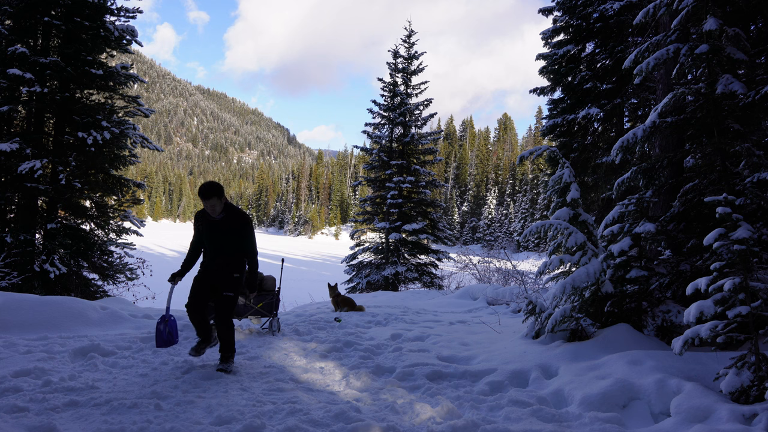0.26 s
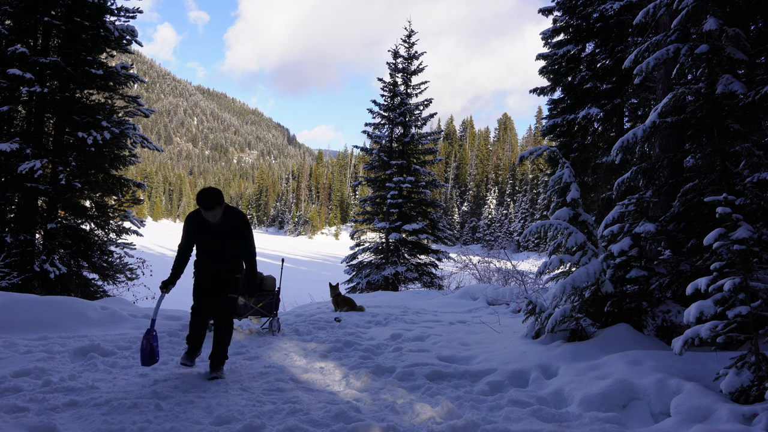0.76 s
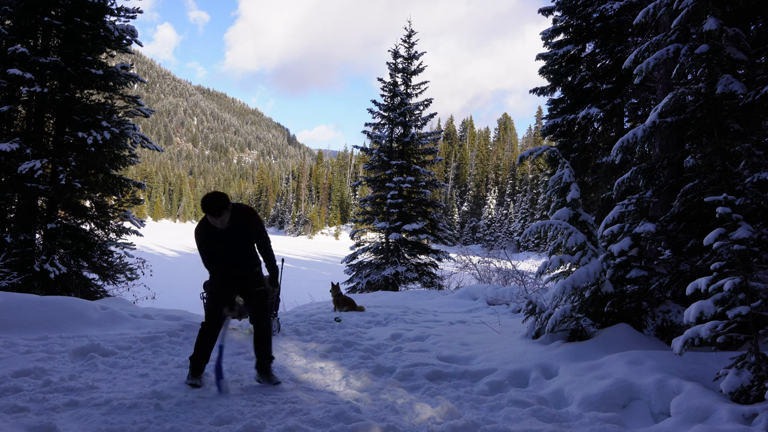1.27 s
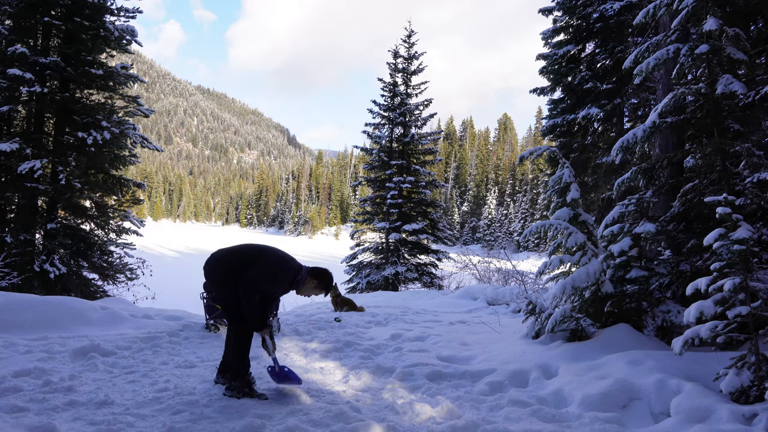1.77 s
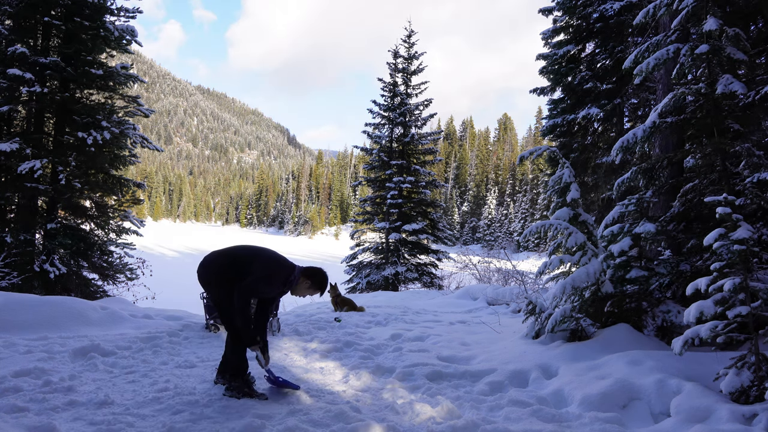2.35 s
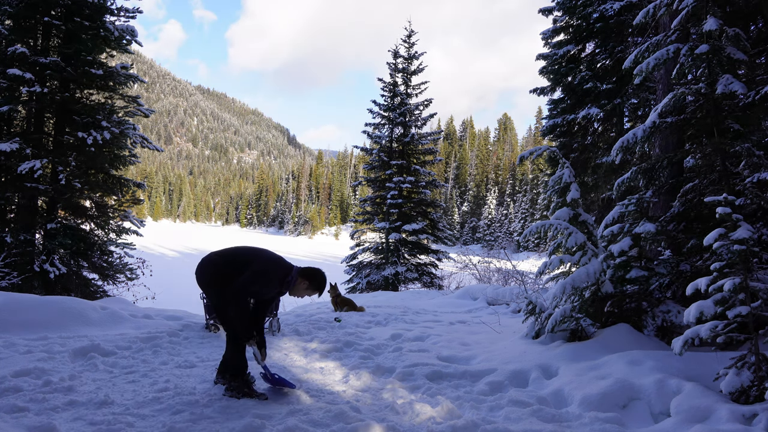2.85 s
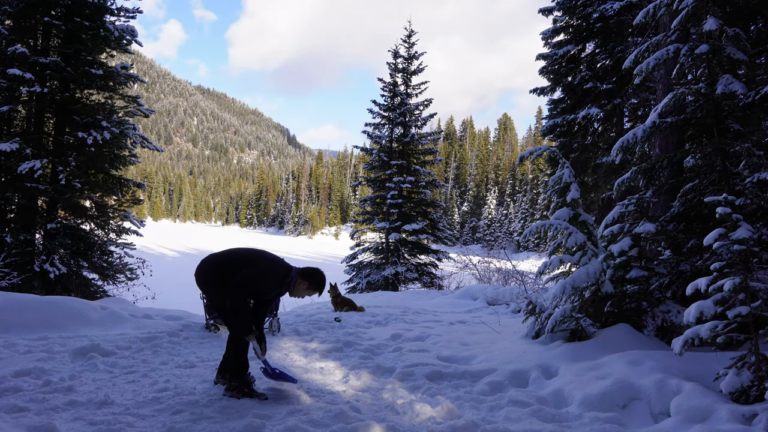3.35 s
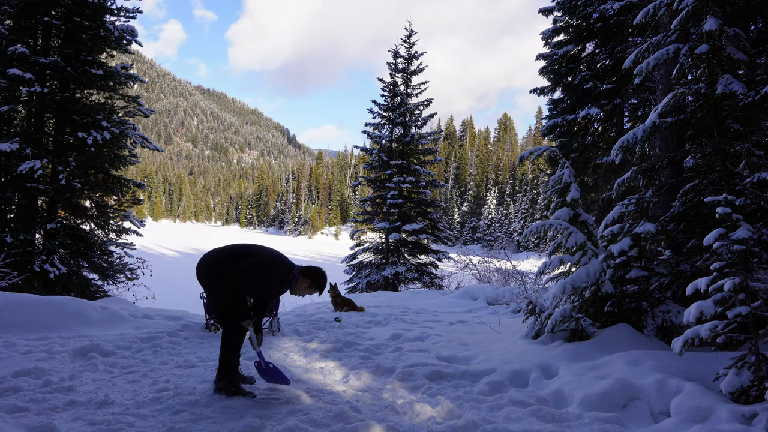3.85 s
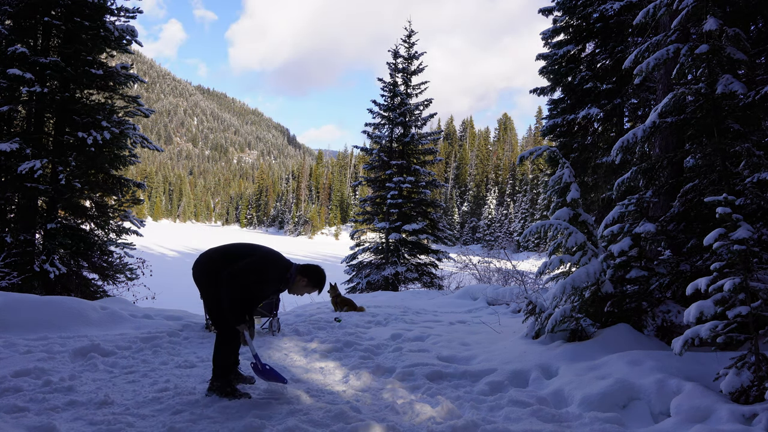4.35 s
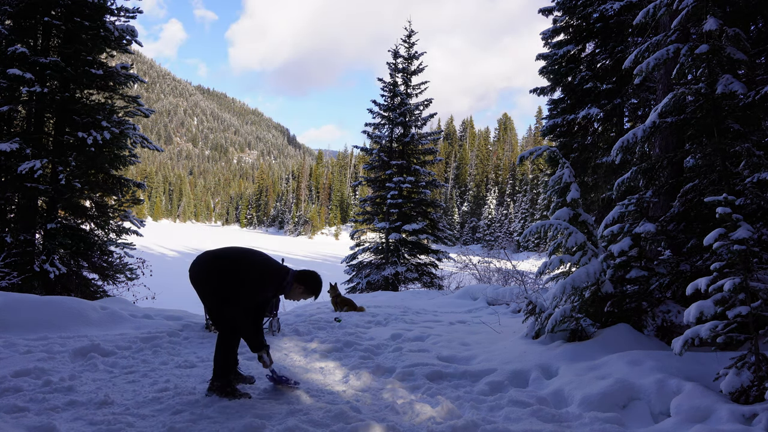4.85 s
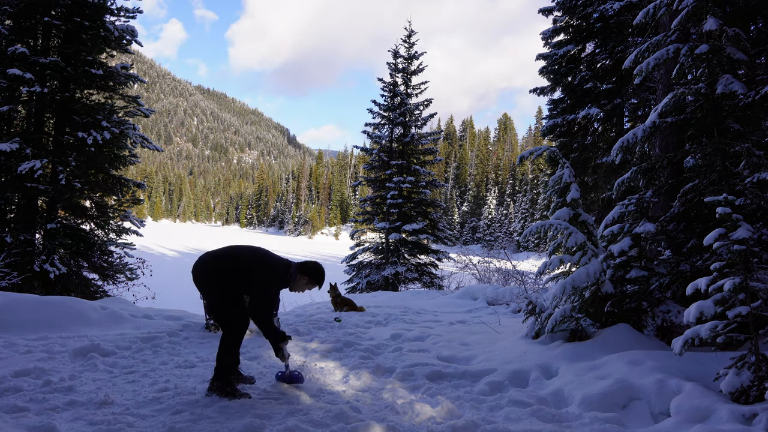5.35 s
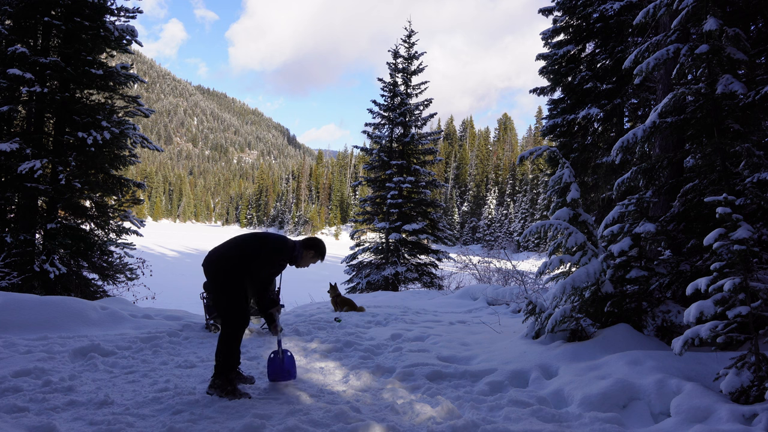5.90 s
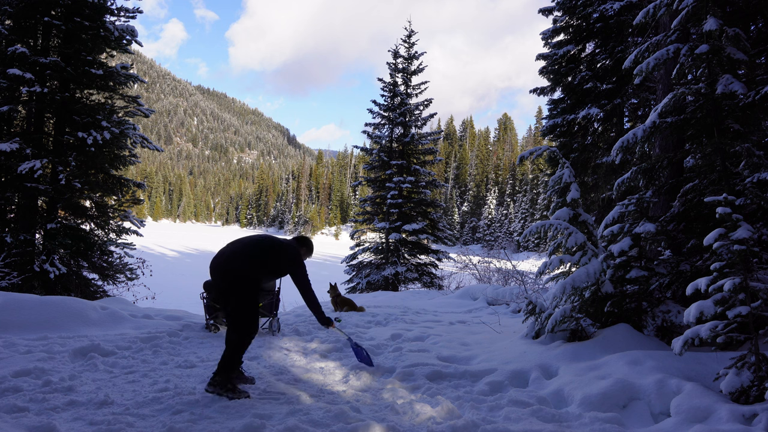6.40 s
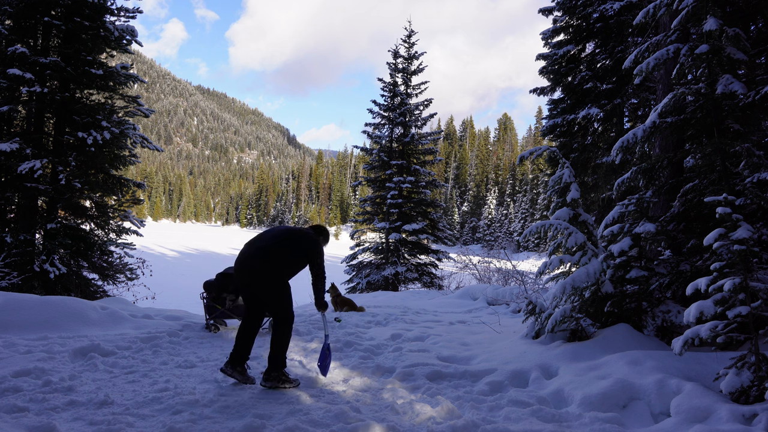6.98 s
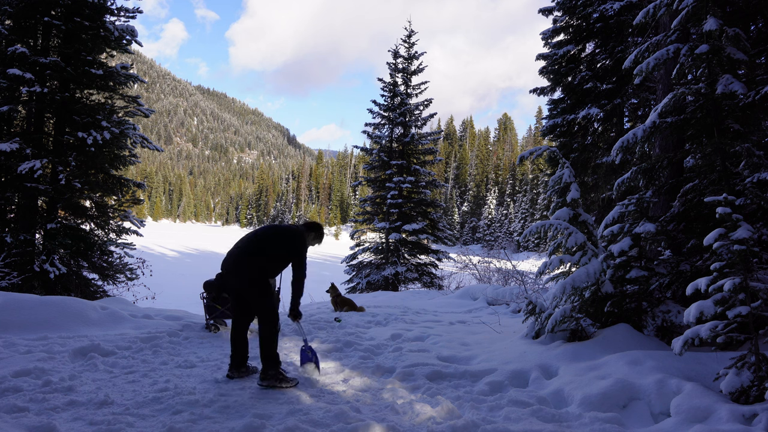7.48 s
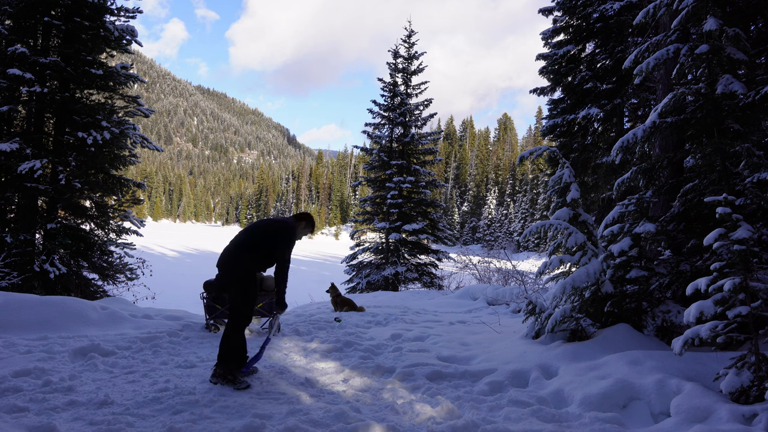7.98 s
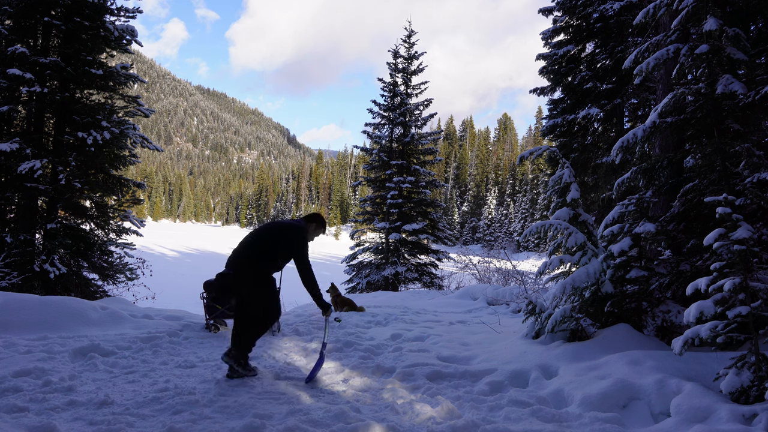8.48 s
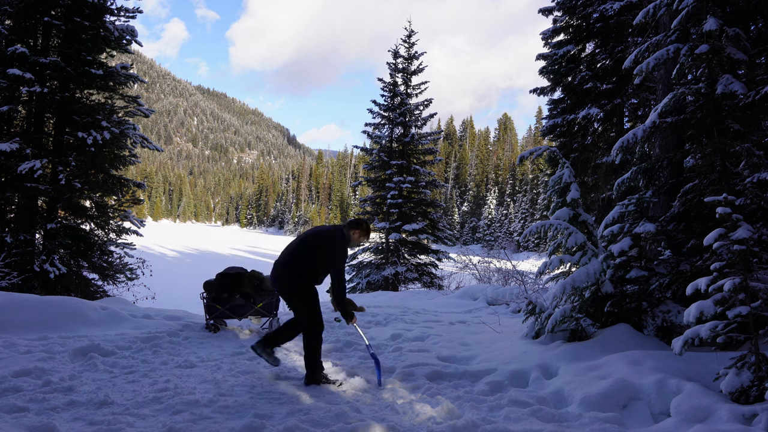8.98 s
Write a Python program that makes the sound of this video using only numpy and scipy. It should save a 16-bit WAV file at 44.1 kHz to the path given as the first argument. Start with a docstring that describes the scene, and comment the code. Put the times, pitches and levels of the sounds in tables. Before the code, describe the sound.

A few muffled snow steps lead to sharp, gritty shovel cuts in frozen crust, then knocks, drags and one loud crunch in quiet forest air.

```python
"""Boots thud in packed snow, then a light metal shovel chops nine times at the crust and is dragged about.
Each cut is a dense burst of random ice-grain clicks, shaped by crust and scoop resonances.
Between cuts the blade ticks, scrapes and rings as a bank of damped modes driven by the contact sounds.
Trees return a faint echo of scattered clicks over very quiet filtered noise; a few thin high chirps fall in pitch."""
import sys
import numpy as np
from scipy import signal
from scipy.fft import rfft, irfft
from scipy.io import wavfile

SR = 44100
rng = np.random.default_rng(int(sys.argv[2]) if len(sys.argv) > 2 else 0)


def generate_wav(sig):
    """Save sig (samples, or channels by samples) to the path in sys.argv[1] as 16-bit PCM at SR."""
    pcm = np.round(np.clip(np.atleast_2d(sig).T, -1, 1) * 32767).astype(np.int16)
    wavfile.write(sys.argv[1], SR, pcm)


N = 407482
TIME_S = np.arange(N) / SR

# spectrum of still forest air: [hz, level_db]
AIR_COLOUR = [(15, -24.5), (25, 4), (87, -9.5), (195, -2), (363, -3), (754, -2), (1160, -10), (1290, -8),
              (2280, -9), (4490, -18), (5730, -20), (14800, -26.5), (16000, -23.5)]
# thin high chirps: [time_s, relative_level_db, mid_pitch_hz]
CHIRPS = [(1.6107, -25.5, 7140), (2.0777, -37.5, 8510), (2.8963, -29, 8860), (3.0415, -53.5, 8400),
          (3.9449, -46.5, 7950), (4.8534, -33, 7010)]
# boot landings, heel first: [heel_s, level_db, grit_db, roll_to_sole_s]
STEPS = [(.126, -33, -3, 0.01), (.416, -32, -1, 0.0096), (0.617, -31, -1.5, 0.02), (.943, -34.5, -.5, .011),
         (8.839, -40.5, 6.5, .012), (8.863, -42, 0.5, .015), (8.903, -49.5, 8.5, .01),
         (9.198, -48, -2, .01)]
# spectrum of a boot on the pack: [hz, level_db]
BOOT_COLOUR = [(18, -36), (30, 3), (253, -1.5), (497, -6), (837, -13), (1030, -9), (1560, -12), (1780, -14),
               (4310, -23.5), (6040, -30.5), (15000, -41.5)]
# heel resonance: centre_hz, width_hz, lift_db
HEEL_THUD = (216, 170, 3.1)
# spectrum of loose crumbs: [hz, level_db]
CRUMB_COLOUR = [(59, -53), (100, -20), (1480, -9.5), (1580, -6.5), (2320, -4.5), (2580, -7), (2930, -2.5),
                (11200, -15.5), (16000, -32)]
# spectrum of breaking crust: [hz, level_db]
CRUST_COLOUR = [(35, -66.5), (60, -24.5), (301, -20), (469, -16.5), (682, -11), (882, -15.5), (1440, -10),
                (2350, -1), (2900, -5), (3270, -0.5), (5210, -2.5), (7230, -8.5), (8710, -9.5),
                (13900, -22), (16000, -32.5)]
# hollow resonances of the scoop pressed into snow: [centre_hz, width_hz, lift_db]
SCOOP = [(503, 55, 5.5), (671, 170, -6), (882, 140, 5.5), (1400, 310, 0.5), (2360, 66, 4.5),
         (2990, 230, 2.5), (7800, 400, -2), (8320, 590, 2.5), (9500, 310, -4)]
# blade sliding over snow: [start_s, length_s, start_level_db, end_level_db, body_db, brightness_db, ring_db]
DRAGS = [(1.225, 0.15, -43, -39, -5.5, 3.5, -2.5), (1.418, .07, -55, -59, -7, 0.5, -6.5),
         (1.621, 0.021, -49, -54.5, 2, -1, -6), (1.736, 0.075, -57.5, -58, -8, -6.5, -9),
         (3.889, 0.062, -65, -55.5, 15, -7, -17), (4.294, .09, -58, -67, -10.5, 2, 0),
         (5.469, 0.081, -69, -60, -5, 2, 0), (5.592, 0.063, -52, -53.5, -1, -4, -5),
         (6.601, 0.31, -54.5, -44.5, 1.5, 3, -10), (7.227, 0.34, -54, -42, -2.5, -2, -8),
         (7.597, 0.21, -56, -57.5, 4, -2.5, -2.5), (8.239, 0.064, -51, -57, 0.5, 5.5, -4),
         (8.328, 0.28, -61.5, -58.5, -4.5, 2, -7.5), (8.593, 0.11, -49, -63.5, -10, 4.5, -4.5),
         (8.951, 0.072, -55.5, -48.5, -7, 2, -8), (9.049, 0.22, -42.5, -57, -12.5, 0.5, -5)]
# blade knocking on crust and lumps: [time_s, level_db, body_db, brightness_db, ring_db]
TAPS = [(0.79, -51.5, 6, -18, -6), (1.05, -54.5, 14.5, -2, -7), (1.223, -42, 9, 9, -3),
        (1.275, -39, 5, 9, -5), (1.324, -28.5, -1, 0.5, -8), (1.354, -28, 8, -1, -19),
        (1.389, -26, -15, -12, -18.5), (1.577, -40, 20, 6, -11.5), (1.714, -39, -20, -17, 1.5),
        (1.829, -38.5, 4, 0.5, -7), (1.847, -41.5, 5.5, -4, -12), (1.562, -39, 7.5, -10.5, -13.5),
        (5.723, -28, 1, -2, -16), (7.174, -61.5, 17, 12, -15), (2.055, -38, 0, -7, -25),
        (2.092, -41.5, 7, -7, -27), (2.408, -37, 6, 0.5, -28), (2.509, -35.5, 0, -2.5, -16),
        (3.359, -49, -13, -5, -1), (3.408, -54.5, -12, -3.5, 3), (3.649, -36.5, -6, 1.5, -1.5),
        (3.771, -45.5, -21.5, 1, -5.5), (4.206, -31, 5, -6.5, -24), (4.575, -40.5, 9, -17, -9.5),
        (4.596, -34, 7.5, -5, -15.5), (4.873, -40.5, -3.5, -11, -23), (5.109, -45, -15, -7.5, -9.5),
        (5.285, -31, 5, 0, -17), (5.365, -41.5, 7, 3.5, -20), (5.963, -35.5, 11.5, -12, -4),
        (6.064, -40, 9.5, -15, -9), (6.123, -39, 3.5, -12.5, -10), (6.428, -45.5, 6, -5.5, -9),
        (6.442, -39, 3.5, -19, -6), (6.67, -46, 5, -3, -13), (6.98, -44, 11, -16, -1),
        (7.249, -39, 10.5, -26, -8), (7.347, -30, 0.5, -12, -12), (7.424, -32, -1, -13, -21),
        (7.501, -32, -6, -7, -8), (7.648, -40, -11, -5, -20), (7.701, -42, 5, 0, -24),
        (7.847, -45.5, 16.5, -13, -4), (8.301, -40, -1, -1, -27), (8.437, -49, 6, -3, -24),
        (8.903, -42.5, 14.5, -8, -5.5), (9.072, -32, -8, -8, -17), (9.101, -40, 1, -2, -3)]
# blade ploughing through crust: [time_s, level_db, rise_s, hold_s, fall_s, body_db, brightness_db]
CRUNCHES = [(3.583, -26, 0.0015, 0.0014, 0.016, 7.5, 0.5), (4.794, -25, 0.0019, 0.0065, 0.014, -0.5, 0),
            (5.724, -27, 0.00077, 0.012, 0.01, 16, -7), (5.819, -29, 0.0089, 0.085, 0.022, 7.5, -4.5),
            (5.851, -23.5, 0.0042, 0.02, 0.0023, 5, -5), (5.959, -23, 0.0093, 0.0033, 0.0068, -0.5, -3),
            (6.553, -36, 0.0037, 0.022, .0066, -1, -1), (6.589, -25, 0.0029, 0.0025, 0.0064, 4.5, -4),
            (6.704, -30, 0.0027, .0025, 0.017, 3, -6.5), (6.798, -36.5, 0.013, .007, 0.0079, 4, -1),
            (6.851, -43, .0097, 0.035, 0.015, 15.5, 2.5), (7.373, -29, 0.0052, 0.018, 0.0089, -2, -8.5),
            (7.539, -20, .004, 0.028, 0.0023, -6, -10), (7.576, -12.5, 0.0086, 0.0089, 0.0092, -6, -11.5),
            (7.741, -39, 0.005, 0.017, 0.014, 6, -1.5), (8.208, -35, 0.00092, 0.028, 0.0093, 3.5, -1),
            (9.184, -32.5, 0.0096, 0.012, 0.019, -5, -3.5)]
# colour of ploughed crust: less deep bass, dips near 500 Hz and 5 kHz, more top treble:
# [centre_hz, width_hz, lift_db]
PLOUGH = [(86, 70, -7.5), (190, 78, 1), (494, 120, -3.5), (5460, 4300, -5), (13300, 6600, 2.5)]
# modes of blade and shaft, t60 before damping: [hz, level_db, t60_s]
BLADE_MODES = [(500, -4, .08), (835, -2, .12), (1238, -4, .25), (1352, -3, .3), (1620, 0, .42),
               (1818, -3, .26), (1950, -9, .2), (2275, -3, .14), (2365, -2, .11), (2720, -9, .9),
               (2930, -1, .18), (3270, -4, .11), (3640, -.5, .13), (3980, -3, .13), (4310, -6, .12),
               (4700, -4, .1), (4925, -6, .22), (5220, -6, .12), (5425, -3, .17), (5740, -6, .14),
               (5950, -6, .14)]
# a hand low on the shaft mutes its bending modes while chopping: [time_s, shaft_ring_db]
GRIP = [(1.4, -0.5), (1.5, -6), (5.7, -5), (6.4, 2.5), (7.3, 5.5), (7.8, -0.5), (8.6, 2), (9.0, 4)]
# chops into crust: [time_s, level_db, touch_lead_s, touch_db, hold_s, fall_s,
# break_hz, brightness_db, slab_thud_db, snow_flight_s, landing_db]
CHOPS = [(1.5127, -15, 0, 5, 0.012, 0.0093, 4040, 0, -30, .18, -50.5),
         (1.923, -17.5, .032, -40, .02, 0.0056, 2900, -4.5, -29, .15, -51.5),
         (2.343, -15.5, 0.023, -38, 0.011, 0.0087, 3600, 1, -26.5, .15, -49.5),
         (2.742, -15, .023, -32.5, .011, 0.0063, 3150, -0.5, -28.5, 0.15, -46.5),
         (3.122, -14.5, .007, -20, 0.011, 0.0079, 4150, .5, -26.5, .15, -44),
         (3.505, -14.5, 0.0073, -25, 0.024, 0.013, 3770, 0, -33.5, 0.22, -52),
         (4.059, -14.5, .011, -24.5, 0.006, 0.0055, 2200, 1, -19.5, 0.17, -57.5),
         (4.739, -12, .018, -30.5, 0.0087, .016, 4000, -0.5, -33, .27, -50),
         (5.206, -16.5, 0.015, -29.5, 0.033, 0.015, 2980, 1.5, -43.5, 0.12, -44.5)]
# resonances of the slab: [centre_hz, width_hz, lift_db]
SLAB_HOLLOW = [(60, 100, -6), (440.4, 150, 7)]

AIR_DB = -67
SOLE_DB, BOOT_PATCHY_DB = -7, 4.5  # sole relative to heel
DRAG_RISE_S, DRAG_FALL_S = 0.003, 0.022
CATCHES_PER_S, CATCH_DB = 16, -5  # small lumps among the grains
SHAFT_LOW_HZ, SHAFT_HIGH_HZ = 1300, 1900
TRICKLE_DB, TRICKLE_FALL_S = -33, 0.065  # relative to the chop
LANDING_RISE_S, LANDING_HOLD_S, LANDING_FALL_S = 0.012, 0.03, 0.022
TOUCH_RISE_S, TOUCH_FALL_S = 0.001, 0.006
CHOP_RISE_S, RISE_SHARE = 0.0007, 0.15  # the share of touch_lead_s is added to the rise
BREAK_WIDTH_HZ, BREAK_DB = 1400, 4  # band in which the crust breaks loudest
SLAB_LAG_S, SLAB_FALL_S, SLAB_BODY_DB = 0.005, 0.0076, 10
TOP_HZ = 16000


def undb(db):
    """Decibels to gain."""
    return 10 ** (np.asarray(db) / 20)


def unit(x):
    """Scale to rms 1."""
    return x / np.sqrt(np.mean(x ** 2))


def add(out, s, x):
    """Mix x into out from time s, cropped to the scene."""
    start = int(s * SR)
    x = x[max(-start, 0):max(N - start, 0)]
    start = max(start, 0)
    out[start:start + len(x)] += x


def wander(x):
    """Random levels at whole numbers of x, joined by straight lines; spread near 1."""
    levels = rng.standard_normal(int(x[-1]) + 2)
    return np.interp(x, np.arange(len(levels)), levels)


def walk(count, rate_hz):
    """A level that takes a new random target rate_hz times a second."""
    return wander(np.arange(count) * rate_hz / SR)


def colour(x, points, body_db=0, bright_db=0, bumps=(), ripple_db=0, size=2048):
    """Minimum-phase filter: points, resonances and random ripple at unit power, then bass and treble shelves."""
    hz = np.maximum(np.arange(size // 2 + 1) * SR / size, 1)
    point_hz, point_db = np.transpose(points)
    db = np.interp(np.log(hz), np.log(point_hz), point_db)
    db = db + ripple_db * wander(np.sqrt(hz) / 2)
    for centre_hz, width_hz, lift_db in bumps:
        db = db + lift_db / (1 + (2 * (hz - centre_hz) / width_hz) ** 2)
    shelves_db = body_db / (1 + (hz / 1350) ** 6) + bright_db / (1 + (4500 / hz) ** 6)
    # folding the cepstrum makes the filter causal
    cepstrum = irfft(np.log(unit(undb(db)) * undb(shelves_db)))
    cepstrum[1:size // 2] *= 2
    cepstrum[size // 2 + 1:] = 0
    impulse = irfft(np.exp(rfft(cepstrum)))
    return signal.fftconvolve(x, impulse)[:len(x)]


def swell(rise_s, hold_s, fall_s):
    """Exponential rise, hold and exponential fall; returns times (0 at the start of the hold) and gains."""
    rise_s, hold_s, fall_s = np.maximum([rise_s, hold_s, fall_s], 1e-4)
    t = np.arange(-6 * rise_s, hold_s + 8 * fall_s, 1 / SR)
    return t, np.exp(np.minimum(t, 0) / rise_s - np.maximum(t - hold_s, 0) / fall_s)


def grains(count, per_second, spread_db):
    """Fractures of single ice bonds: random clicks, a few much larger than the rest; rms 1."""
    hit = rng.random(count) < per_second / SR
    strength = undb(spread_db * np.minimum(rng.exponential(size=count), 4))
    sign = rng.choice([-1, 1], count)
    return unit(hit * strength * sign + 1e-9)


def burst(rise_s, hold_s, fall_s, per_second, spread_db, patchy_db):
    """Grains that swell, hold and die away; returns the lead-in time and the sound."""
    t, shape = swell(rise_s, hold_s, fall_s)
    patches = undb(patchy_db * walk(len(t), 450))
    sound = shape * grains(len(t), per_second, spread_db) * patches
    # the blow fixes the energy, chance only shares it among the grains
    return -t[0], unit(sound) * np.sqrt(np.mean(shape ** 2))


def air():
    """Still air: a faint far rush of filtered noise whose level wanders a little."""
    level_db = AIR_DB + 1.4 * walk(N, 1.2)
    return undb(level_db) * unit(colour(rng.standard_normal(N), AIR_COLOUR))


def forest(x, t60_s=0.66, build_s=0.014):
    """Scattered echoes from trunks and branches, with little bass."""
    t = np.arange(SR) / SR
    decay = np.exp(-np.log(1000) * t / t60_s)
    build = 1 - np.exp(-t / build_s)
    echo = grains(SR, per_second=4800, spread_db=11.5) * decay * build
    echo_colour = [(100, -12.5), (500, -4), (1500, -3.5), (3500, -6.0), (7000, -1.0), (15000, -10.5)]  # hz, db
    echo = colour(echo / np.linalg.norm(echo), echo_colour)
    return signal.fftconvolve(x, echo)[:N]


def chirps(width_s=0.0016, glide_hz=180, waver_hz=260, overtone_db=-24, level_db=-4):
    """Tiny falling tones with an unsteady pitch, one overtone and a bell envelope of a few milliseconds."""
    out, t = np.zeros(N), np.arange(1024) / SR
    u = t / width_s - 2
    for s, db, hz in CHIRPS:
        pitch_hz = hz - glide_hz * np.clip(u, -2, 2) + waver_hz * walk(len(t), 1400)
        phase = 2 * np.pi * np.cumsum(pitch_hz) / SR
        tone = np.sin(phase) + undb(overtone_db) * np.sin(2 * phase)
        add(out, s - width_s, undb(db + level_db) * np.exp(-u ** 2 / 2) * tone)
    return out


def steps(sway_hz=26, sway_s=0.13, sway_db=-15, settle_db=-24, settle_s=0.034):
    """Heel and sole thud into the pack; it settles with a few grains and sways on slowly."""
    out, t = np.zeros(N), np.arange(SR) / SR
    sway = np.sin(2 * np.pi * sway_hz * t) * (t / sway_s) * np.exp(1 - 2 * t / sway_s)
    for s, db, grit_db, roll_s in STEPS:
        heel = s, db, grit_db - 1.0
        sole = s + roll_s, db + SOLE_DB, grit_db + 4.5
        for at_s, part_db, part_grit_db in (heel, sole):
            lead_s, sound = burst(rise_s=0.003, hold_s=0.0024, fall_s=0.0088,
                                  per_second=3100, spread_db=3.5, patchy_db=BOOT_PATCHY_DB)
            # grit lifts everything above the body
            sound = colour(np.pad(sound, (0, 2048)), BOOT_COLOUR, body_db=-part_grit_db,
                           bumps=[HEEL_THUD], ripple_db=2.0)
            add(out, at_s - lead_s, undb(part_db + part_grit_db) * sound)
        lead_s, sound = burst(rise_s=0.018, hold_s=0.019, fall_s=settle_s,
                              per_second=1100, spread_db=3.5, patchy_db=-2.5)
        sound = colour(sound, CRUMB_COLOUR, body_db=13, bright_db=-8.5)
        add(out, s - lead_s, undb(db + settle_db) * sound)
        add(out, s, undb(db + sway_db) * sway)
    return out


def crumbs(shape, body_db, bright_db, catch_s=0.0024):
    """Loose grains in uneven clusters under an envelope, with now and then a larger lump."""
    count = len(shape)
    catches = rng.random(count) < CATCHES_PER_S / SR
    lumps = signal.lfilter([1], [1, -np.exp(-1 / (catch_s * SR))], catches)
    flow = unit(undb(3.4 * walk(count, 130)))
    flow = flow + undb(CATCH_DB) * lumps / np.sqrt(CATCHES_PER_S * catch_s / 2)
    grit = unit(grains(count, per_second=3200, spread_db=1.0) * flow)
    return colour(grit * shape, CRUMB_COLOUR, body_db, bright_db, SCOOP, ripple_db=2)


def loose_snow():
    """After a chop crumbs trickle into the cut, and the flicked snow patters down a little later."""
    out = np.zeros(N)
    for s, db, *_, flight_s, landing_db in CHOPS:
        t, shape = swell(0.004, 0.02, TRICKLE_FALL_S)
        add(out, s + t[0], undb(db + TRICKLE_DB) * crumbs(shape, body_db=5, bright_db=-3))
        t, shape = swell(LANDING_RISE_S, LANDING_HOLD_S, LANDING_FALL_S)
        landing_s = s + flight_s - LANDING_HOLD_S / 2
        add(out, landing_s + t[0], undb(landing_db) * crumbs(shape, body_db=-3.5, bright_db=1.95))
    return out


def scrapes():
    """The sliding blade catches and slips as pressure grows or eases; returns sound and blade shake."""
    out, shake = np.zeros(N), np.zeros(N)
    for s, length_s, start_db, end_db, body_db, bright_db, ring_db in DRAGS:
        t, shape = swell(DRAG_RISE_S, length_s, DRAG_FALL_S)
        pressure = undb(np.interp(t, [0, length_s], [start_db, end_db]))
        sound = crumbs(shape * pressure, body_db, bright_db)
        add(out, s + t[0], sound)
        add(shake, s + t[0], undb(ring_db) * sound)
    return out, shake


def taps():
    """Light contacts break only a few grains; returns their sound and the shake they give the blade."""
    out, shake = np.zeros(N), np.zeros(N)
    for s, db, body_db, bright_db, ring_db in TAPS:
        lead_s, sound = burst(rise_s=0.00045, hold_s=0.0039, fall_s=0.0046,
                              per_second=5800, spread_db=3.5, patchy_db=2.0)
        sound = colour(np.pad(sound, (0, 1024)), CRUST_COLOUR, body_db, bright_db, SCOOP, ripple_db=1.5)
        sound = undb(db) * sound
        add(out, s - lead_s, sound)
        add(shake, s - lead_s, undb(ring_db) * sound)
    return out, shake


def blade(force, damping=1, contact_db=3.0):
    """Blade and shaft ring as resonators; the contact point moves, so each mode's share of force changes."""
    out, held = np.zeros(N), undb(np.interp(TIME_S, *np.transpose(GRIP)))
    for hz, db, t60_s in BLADE_MODES:
        radius = np.exp(-np.log(1000) * damping / (t60_s * SR))
        angle = 2 * np.pi * hz / SR
        gain = undb(db) * np.sin(angle) * np.sqrt(2 * (1 - radius ** 2) / len(BLADE_MODES))
        share = undb(contact_db * walk(N, 9.9))
        if SHAFT_LOW_HZ < hz < SHAFT_HIGH_HZ:
            share = share * held
        poles = [1, -2 * radius * np.cos(angle), radius ** 2]
        out += signal.lfilter([gain], poles, force * share + 1e-18)
    return out


def crunch(rise_s, hold_s, fall_s, body_db, bright_db, bumps=()):
    """Dense burst of breaking crust, each piece resonating in its own way; returns lead-in time and sound."""
    lead_s, sound = burst(rise_s, hold_s, fall_s, per_second=16000, spread_db=1.87, patchy_db=1.46)
    sound = np.pad(sound, (0, 1024))
    return lead_s, colour(sound, CRUST_COLOUR, body_db, bright_db, [*SCOOP, *bumps], ripple_db=2.5)


def crunches():
    """Pushed along, the blade ploughs through patches of crust."""
    out = np.zeros(N)
    for s, db, *shape in CRUNCHES:
        lead_s, sound = crunch(*shape, bumps=PLOUGH)
        add(out, s - lead_s, undb(db) * sound)
    return out


def chops():
    """The edge touches (in most chops), the crust collapses, the slab below gives way with a thud."""
    out = np.zeros(N)
    for s, db, early_s, touch_db, hold_s, fall_s, break_hz, bright_db, thud_db, *_ in CHOPS:
        if early_s > 0:
            lead_s, touch = crunch(TOUCH_RISE_S, early_s / 2, TOUCH_FALL_S, body_db=0, bright_db=-5)
            add(out, s - early_s - lead_s, undb(touch_db) * touch)
        rise_s = CHOP_RISE_S + RISE_SHARE * early_s
        lead_s, collapse = crunch(rise_s, hold_s, fall_s, body_db=1.0, bright_db=bright_db,
                                  bumps=[(break_hz, BREAK_WIDTH_HZ, BREAK_DB)])
        add(out, s - lead_s, undb(db) * collapse)
        lead_s, thud = crunch(0.002, hold_s, SLAB_FALL_S, body_db=SLAB_BODY_DB, bright_db=-2,
                              bumps=SLAB_HOLLOW)
        add(out, s + SLAB_LAG_S - lead_s, undb(thud_db) * thud)
    return out


def scene():
    """Snow damps the blade while it cuts or slides; after a tap it rings freely."""
    cuts, loose = chops() + crunches(), loose_snow()
    knocks, shake = taps()
    slides, rub = scrapes()
    buried = undb(-22) * cuts
    damped_ring = blade(buried + rub + undb(-6) * loose, damping=2.0, contact_db=2.0)
    free_ring = blade(shake, contact_db=3.5)
    near = cuts + knocks + slides + loose + damped_ring + free_ring + steps() + chirps()
    return (near + undb(-31.5) * forest(near) + air())[None]


def record(dry):
    """Steep elliptic low-pass removes the treble above TOP_HZ."""
    return signal.sosfilt(signal.ellip(10, 0.2, 70, TOP_HZ, fs=SR, output="sos"), dry)


dry = scene()
out = record(dry)
generate_wav(out)
```